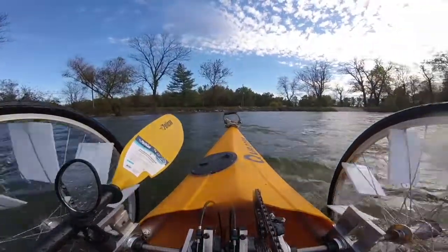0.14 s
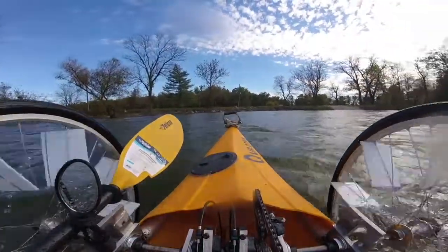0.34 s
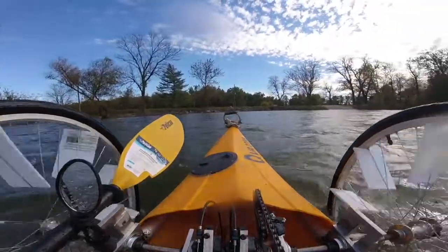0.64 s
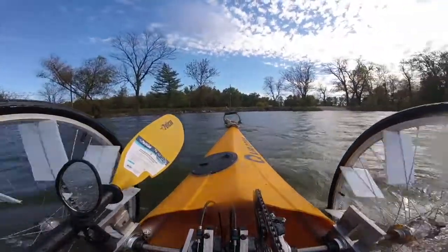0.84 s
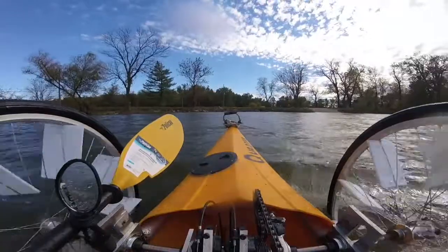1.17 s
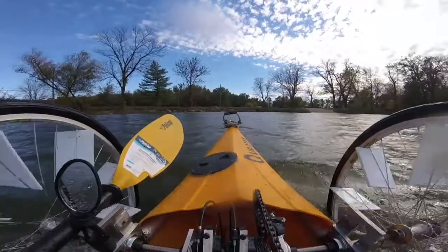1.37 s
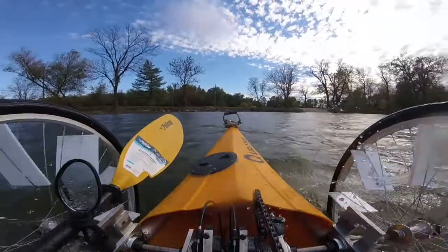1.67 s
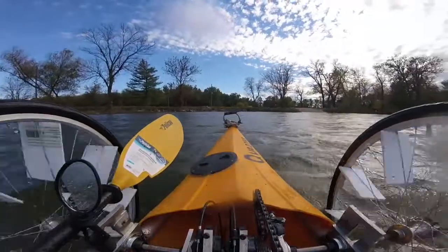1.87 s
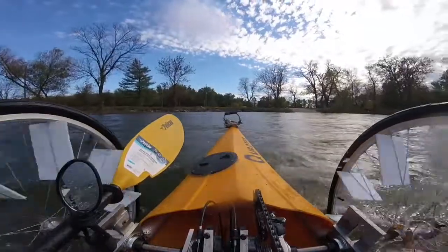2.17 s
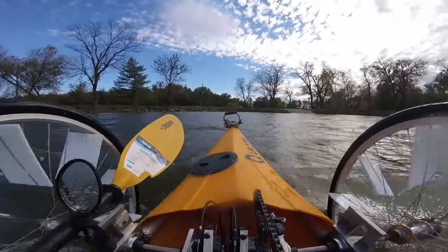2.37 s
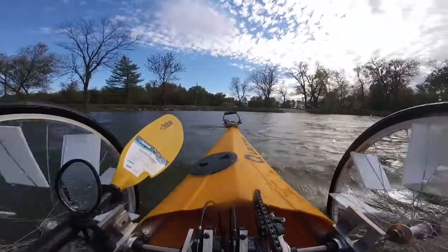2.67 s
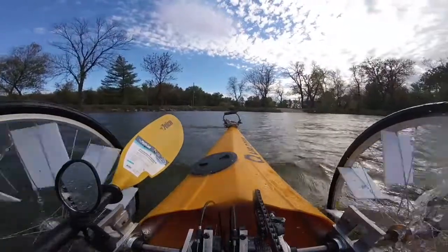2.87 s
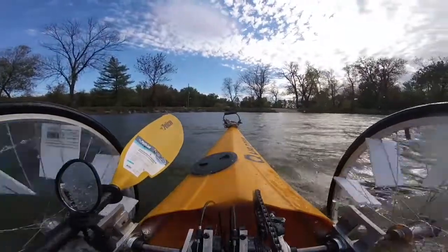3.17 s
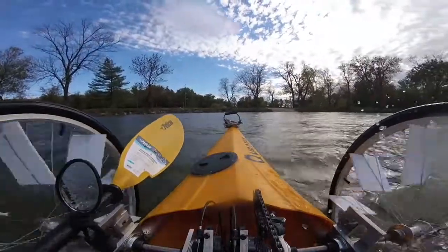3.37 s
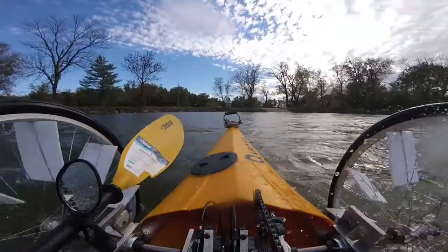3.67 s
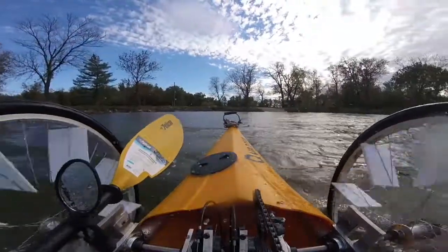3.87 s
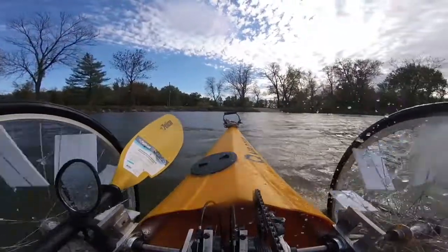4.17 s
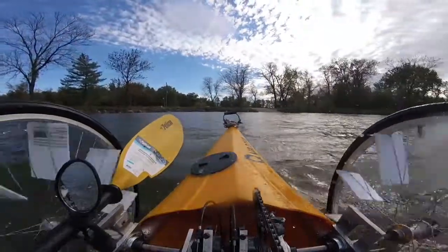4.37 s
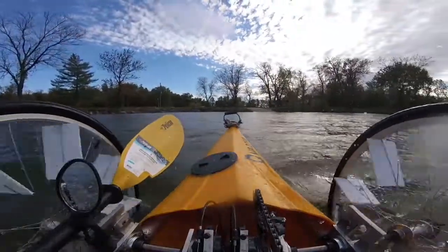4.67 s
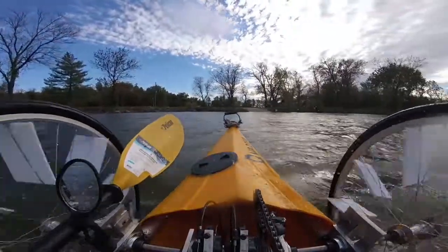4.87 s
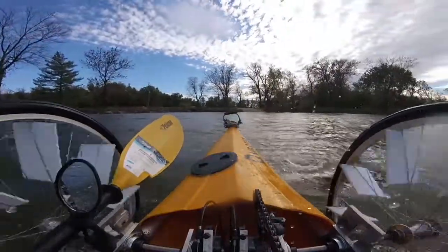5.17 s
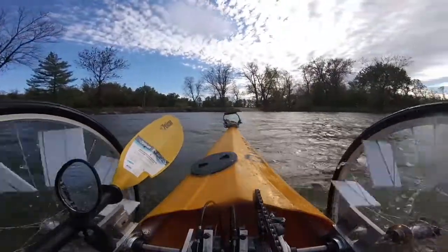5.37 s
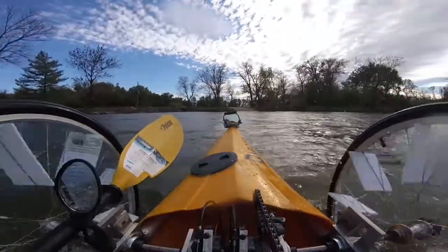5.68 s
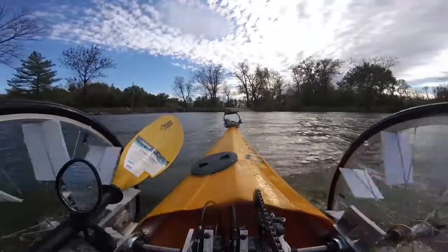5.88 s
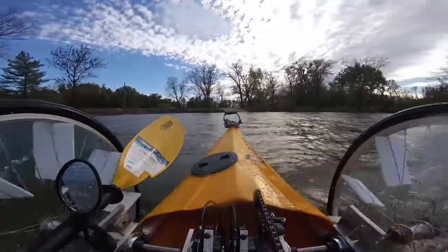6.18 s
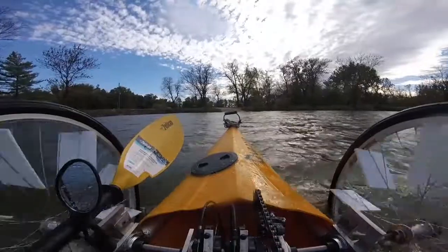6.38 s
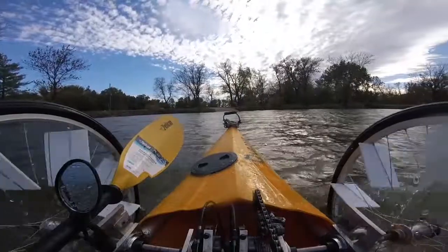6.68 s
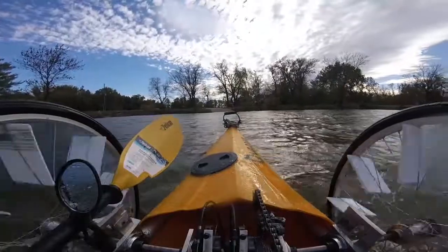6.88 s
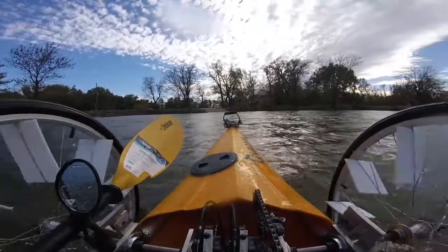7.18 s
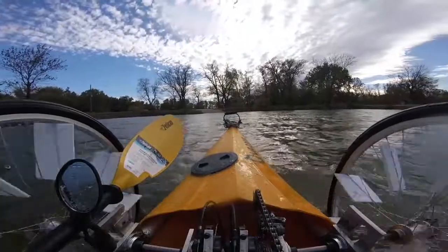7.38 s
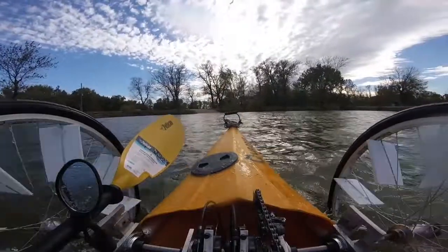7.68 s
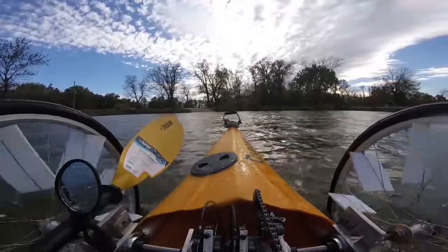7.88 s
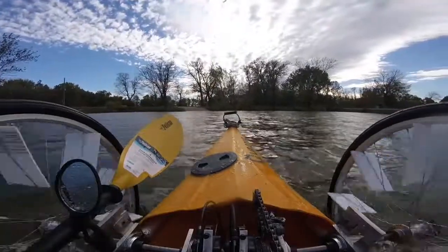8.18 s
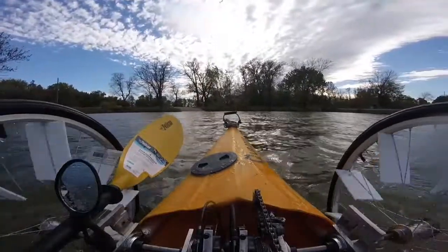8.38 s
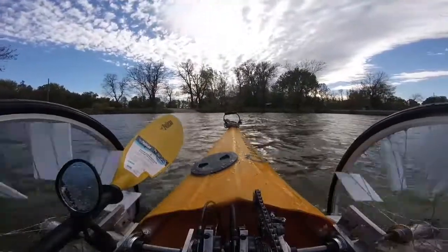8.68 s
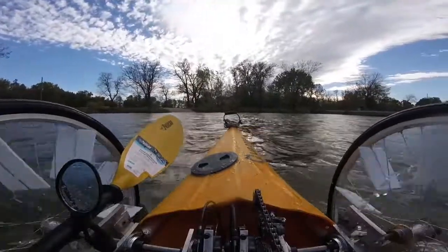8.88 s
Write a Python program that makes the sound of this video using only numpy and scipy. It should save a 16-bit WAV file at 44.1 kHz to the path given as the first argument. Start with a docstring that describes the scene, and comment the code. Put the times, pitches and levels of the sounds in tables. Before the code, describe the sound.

A close microphone on a kayak deck catches a constant rush of water thrown by flat blades. Bubbly gurgles, small slaps and crisp patter overlap, and low plopping gulps cluster around three to five seconds. Sharp drops hit the microphone's hard case with brief, high rings. Soft, very low wind buffets come and go. The sound is dry and outdoors, mostly centred, with faint wide foam behind; the closing seconds are strongest.

```python
"""Water rushes, gurgles and patters around a kayak that two paddle wheels drive across a lake.
The blades churn up bubbles, drag down air pockets that gulp, and throw splashes and spray.
Bubbles and gulps are fading sine tones; spray, foam and wake are mostly shaped bursts of noise.
Drops tick on a hard case on the deck, which rings and knocks; slow, deep noise makes the gusts
of wind thud softly against the microphone."""
import sys
import numpy as np
from scipy import signal
from scipy.fft import rfft, irfft, next_fast_len
from scipy.io import wavfile
from scipy.ndimage import uniform_filter1d, map_coordinates

SR = 44100
rng = np.random.default_rng(int(sys.argv[2]) if len(sys.argv) > 2 else 0)


def generate_wav(sig):
    """Save sig (samples, or channels by samples) to the path in sys.argv[1] as 16-bit PCM at SR."""
    pcm = np.round(np.clip(np.atleast_2d(sig).T, -1, 1) * 32767).astype(np.int16)
    wavfile.write(sys.argv[1], SR, pcm)


N = 398307  # length in samples

# Thrown water. Each row: time in seconds, level in dB before flutter and sheets.
FLOW_LEVEL = [(0.0, -40.5), (0.7, -38), (0.98, -45), (1.58, -44), (2.16, -40.5), (2.6, -48), (3.22, -40),
              (3.64, -42.5), (3.95, -53.5), (4.07, -51.5), (4.63, -43), (5.13, -44), (6.14, -38),
              (7.04, -41.5), (7.55, -36), (7.95, -39), (9.03, -37)]
# Sheets of water falling back on the lake. Each row: start in seconds, length in seconds, lift in dB.
FALLING_SHEETS = [(0.78, 0.16, 4), (1.125, 0.044, 2), (1.635, 0.15, 2), (1.872, .18, 4.5), (2.239, 0.15, 4),
                  (3.036, 0.043, 4.5), (3.712, 0.16, 5.5), (4.279, 0.029, 6.5), (4.394, 0.035, 4.5),
                  (5.395, 0.14, 2), (7.326, 0.041, 3.5), (7.585, 0.1, 2), (8.694, .13, 2.5),
                  (8.901, 0.088, 4)]
# Stirring under the surface. Each row: time in seconds, level in dB before the churn gains.
STIR_LEVEL = [(0, -71), (.15, -48.5), (.75, -46.5), (1.26, -89), (1.78, -42.5), (2.0, -70), (2.62, -96),
              (3.35, -45), (3.8, -55), (4.1, -64), (4.22, -43), (4.65, -52), (5.28, -89), (5.5, -59),
              (5.8, -86), (8.3, -97), (9.03, -53)]
# Wind between gusts. Each row: time in seconds, level in dB before the breeze gain and lumps.
BREEZE_LEVEL = [(0.0, -46.5), (1.03, -45), (1.26, -58), (1.42, -51), (2.2, -53.5), (2.65, -59.5),
                (3.3, -48), (3.95, -43.5), (4.1, -74), (4.25, -52.5), (4.93, -49), (5.27, -73), (5.55, -52),
                (5.88, -78), (6.34, -43), (6.56, -68), (7.17, -82), (7.67, -55), (8.15, -89), (9.03, -54)]
# Gusts that thud on the case. Each row: peak time in seconds, level in dB before the gust gain.
WIND_GUSTS = [(.19, -40), (.56, -47), (0.729, -37), (.93, -37), (.98, -31.5), (1.08, -42), (1.151, -35.5),
              (1.79, -43), (2.288, -36.5), (2.46, -32), (3.0, -41), (3.33, -46), (3.39, -39), (3.63, -33),
              (3.77, -32.5), (3.88, -41), (3.959, -39.5), (4.009, -32), (4.55, -53), (4.85, -37),
              (5.05, -31), (5.46, -40), (6.09, -35), (6.359, -30.5), (7.55, -40), (7.61, -43), (7.801, -41),
              (8.52, -48), (8.65, -39), (8.85, -43), (9.02, -35)]
# Air pockets dragged under by a blade. Each row: start in seconds, base pitch in Hz,
# peak level in dB before a 6 dB cut, time to fade by 60 dB in seconds.
AIR_POCKETS = [(0.148, 250, -35.5, 0.1), (0.215, 258, -28.5, 0.092), (0.335, 262, -28.5, 0.096),
               (0.623, 379, -24.5, 0.086), (1.138, 707, -33, 0.1), (1.479, 350, -41.5, 0.11),
               (1.665, 176, -42, 0.094), (1.701, 273, -26.5, 0.046), (1.878, 552, -32.5, 0.13),
               (2.338, 577, -35, 0.11), (2.453, 258, -39.5, 0.17), (3.021, 261, -25.5, 0.1),
               (3.053, 630, -22.5, 0.049), (3.271, 370, -29, 0.06), (3.295, 668, -31, 0.046),
               (3.3, 150, -37, 0.087), (3.34, 168, -29.5, 0.1), (3.372, 110, -32, 0.058),
               (3.39, 218, -28.5, 0.098), (3.458, 126, -29, 0.058), (3.58, 254, -23.5, 0.074),
               (3.618, 262, -29, 0.051), (3.733, 354, -25.5, 0.17), (3.784, 267, -26.5, 0.076),
               (3.909, 140.2, -25.5, 0.061), (3.91, 645, -35, 0.094), (4.015, 299, -33, 0.059),
               (4.148, 525, -32.5, 0.086), (4.218, 233, -32, 0.2), (4.286, 263, -29, 0.072),
               (4.3, 588, -33.5, 0.062), (4.435, 614, -36, 0.088), (4.54, 248, -35.5, 0.099),
               (4.795, 240, -38, 0.095), (5.044, 242, -25, 0.03), (5.065, 330, -34, 0.068),
               (5.162, 757, -27.5, 0.043), (5.161, 417, -31, 0.054), (5.162, 603, -28, 0.1),
               (5.465, 652, -35, 0.075), (5.535, 259, -38, 0.094), (6.087, 264, -34.5, 0.092),
               (6.154, 294, -23.5, 0.067), (6.335, 259, -41, 0.14), (6.451, 245, -39, 0.11),
               (6.82, 600, -33.5, 0.079), (7.032, 610, -32, 0.082), (7.263, 369, -17, 0.085),
               (7.286, 263, -36, .07), (7.786, 498, -29, 0.11), (8.7, 367, -19, 0.078),
               (8.727, 288, -35, .06)]
# Drops on the case and deck. Each row: start in seconds, crack level in dB, ring level in dB,
# knock level in dB (all before the final colour and 1 dB lift), knock pitch in Hz.
BIG_DROPS = [(0.2464, -37, -36.5, -34, 2000), (0.3527, -41.5, -57.0, -54, 3220.0),
             (0.3833, -39.5, -57, -58, 2380), (0.5238, -34.5, -39, -39.5, 4010.0),
             (0.6207, -37, -46, -39, 2410.0), (0.6576, -43, -41, -55.0, 1680),
             (0.795, -39, -57, -56.0, 2470), (1.086, -44.5, -52, -50, 1660.0),
             (1.238, -44, -51, -49, 2240.0), (1.323, -39.5, -51, -61.0, 2280.0),
             (1.5547, -38.5, -60.5, -62.0, 2820.0), (1.6995, -38, -44, -42.5, 3460),
             (1.84, -38.5, -42, -58.5, 3040.0), (2.1208, -46, -40.5, -44.5, 2720.0),
             (2.3334, -41, -42, -42, 2370), (2.7079, -52, -46.0, -52, 1930),
             (2.746, -54, -60.5, -43.5, 2200), (2.7724, -60, -51.0, -48, 2420),
             (2.8412, -55, -45, -50, 1790.0), (3.0571, -54, -39.0, -49, 1560.0),
             (3.1086, -35.5, -59.0, -45, 3900.0), (3.2472, -59, -59, -38.5, 3060.0),
             (3.5282, -45, -52, -48, 2560.0), (3.654, -41.5, -37, -53, 3000.0),
             (3.7796, -44.5, -40.5, -43, 2060.0), (4.08, -46.5, -63.5, -56, 1660),
             (4.1479, -43.5, -43.0, -66.5, 2940.0), (4.278, -59, -60, -49, 2000),
             (4.3041, -52, -48.0, -56, 1440), (4.333, -63, -58, -52, 2010), (4.4, -46.5, -60, -46, 2140),
             (4.7367, -39, -37, -57.0, 3060.0), (5.005, -39, -58, -58, 2560.0),
             (5.1641, -58.0, -60.5, -42.5, 1930), (5.3514, -41.5, -61, -42.5, 2500),
             (5.4008, -46, -47, -41, 1910), (5.573, -42.5, -55, -43, 2860),
             (5.6293, -44, -59.0, -40.5, 1990), (5.7, -39, -58.5, -60, 2480.0),
             (5.8343, -39, -54, -46, 2500), (5.934, -57, -41.5, -40, 2000),
             (5.976, -39.5, -54.0, -53, 1730), (6.2563, -38, -44, -40, 2430), (6.5348, -39, -40, -49, 4000),
             (6.539, -42, -49, -58.0, 2780.0), (6.8614, -40, -39.5, -39, 2950),
             (7.0118, -43.5, -41.5, -40, 2470), (7.322, -36, -37, -35.5, 3840.0),
             (7.4603, -36.5, -35.5, -33.5, 2310), (7.592, -33.5, -31.5, -46, 1590.0),
             (7.8664, -42, -38.5, -47.0, 3060), (8.0364, -38.5, -34.0, -56.0, 2640.0),
             (8.1871, -31.5, -35, -37, 2960.0), (8.2673, -42.0, -38.5, -52, 3480),
             (8.3242, -35.5, -36, -38.5, 2120), (8.5384, -40, -60, -47, 2640),
             (8.6379, -43, -55.0, -39.5, 2870), (8.7223, -53, -46, -35, 1920),
             (8.7732, -43, -51.0, -39, 2380)]
# The ring of the case: centre in Hz, width in Hz, boost in dB.
CASE_RING = (6500, 346, 8.35)

# Tone colours of the sounds. Each row: frequency in Hz, relative level in dB.
SPLASH_COLOUR = [(200, -56), (300, -44), (400, -27), (520, 0.5), (760, 0), (1400, -4.5), (2000, -2.5),
                 (2900, -11.5), (3800, -13.5), (5500, -22), (9000, -54)]
SPRAY_COLOUR = [(300, -84), (1200, -49), (2600, 0), (3800, -11.5), (5000, -1), (6000, -2.5), (7400, -6),
                (9000, -3), (10000, -5), (11000, -12.5), (12400, -54.5)]
DRIZZLE_COLOUR = [(300, -100), (1200, -24), (2500, 5), (3700, -18), (5000, 1), (6200, 3.5), (7400, -3),
                  (9000, -3), (10000, -5.5), (11000, -8), (12400, -35.5)]
TICK_COLOUR = [(200, -82), (450, -45), (800, -18), (1500, -14), (3000, -9.5), (4000, -8), (5300, 1),
               (7500, -7), (9800, -5), (11000, -17), (12500, -43)]
SNAP_COLOUR = [(250, -85), (700, -20), (1900, -0.5), (6000, 2.5), (10000, -3.5), (12500, -48)]
BUFFET_COLOUR = [(10, -18.5), (22, 2.5), (36, 4.5), (55, -7.5), (70, -24), (90, -17), (160, -69)]
WAKE_COLOUR = [(200, -34), (380, -21), (520, -8), (800, -9), (1400, -11.5), (2200, -15.5), (3400, -17),
               (5200, -17.5), (6600, -18), (7600, -14), (10000, -15.5), (11000, -32), (12200, -52)]
# Balance of the two sides. Each row: frequency in Hz, left over right in dB.
LEFT_LEAN = [(80, 0.5), (160, 2.1), (380, 0.5), (700, 2), (1400, 1.5), (2200, 0), (3600, 1), (6500, -0.24),
             (10000, 3.5), (12000, 1)]

TOP_HZ = 12600  # nothing is kept from here up
FLUTTER_DB, FLUTTER_PER_S = 0.93, 14  # the blades shed their water unevenly
SHEET_RISE_S, SHEET_FALL_S = 0.0019, 0.0018
SPLASH_DB, SPLASH_FOLLOW = -5.13, 0.94  # level over the mean flow; dB of splash per dB of flow
SPRAY_SHIFT_DB = -1.5  # from the flow to the level that drives the spray
HEAVY_SPRAY_DB, HEAVY_WIDTH_DB = -47.5, 4.5  # around this driving level drizzle turns to full spray
GURGLE_DB = -23.5  # over the flow
STIR_DB, STIR_SWING_DB, STIR_PER_S = 3.5, 7, 16  # gain; depth and rate of the lumps
BREAKUP_DB, BREAKUP_RISE_S, BREAKUP_FALL_S = -21.5, 0.0098, 0.0097  # pockets break into deep bubbles
GUST_STIR_DB = -18.5  # the water is rougher in a gust
GUST_HOLD_S, GUST_RISE_S, GUST_FALL_S = 0.018, 0.0092, 0.012  # one shape for all gusts
GUST_DB, BREEZE_DB = 2.5, 1.5  # gains
BREEZE_SWING_DB, BREEZE_PER_S = 7, 17  # depth and rate of the lumps
SWELL_SHARE = 0.088  # an air pocket's swelling time as a share of its fading time


def amp(db):
    """Decibels to gain."""
    return 10 ** (np.asarray(db) / 20)


def unit(x):
    """Scale x to an average strength (rms) of 1."""
    return x / np.sqrt(np.mean(x ** 2) + 1e-20)


def weighed(sound):
    """Scale a short sound so its energy equals 10 ms at rms 1."""
    return sound * np.sqrt(SR / 100 / np.sum(sound ** 2))


def along(points, hz):
    """Read a table of frequencies and values on a log frequency axis."""
    f, v = np.transpose(points)
    return np.interp(np.log(hz + 1), np.log(f + 1), v)


def curve(rows):
    """Join the timed levels of a table with straight lines, one value per sample."""
    s, level_db = np.transpose(rows)
    return np.interp(np.arange(N) / SR, s, level_db)


def wobble(rate):
    """Draw a smooth random curve through this many random points a second."""
    points = rng.standard_normal(int(N * rate / SR) + 4)
    return map_coordinates(points, [np.arange(N) * rate / SR])


def swell(start, hold, rise, fall):
    """An envelope that rises to 1 at start, holds and dies away."""
    t = np.arange(N) / SR - start
    before = np.maximum(-t / rise, 0)
    after = np.maximum((t - hold) / fall, 0)
    return np.exp(-np.minimum(before + after, 30))


def filtered(x, response):
    """Multiply the spectrum of x by a response given as a function of frequency."""
    size = next_fast_len(N + SR // 2)
    return irfft(rfft(x, size) * response(np.fft.rfftfreq(size, 1 / SR)), size)[..., :N]


def coloured(x, points, size=4096):
    """Give x a tone colour with a filter that never sounds ahead of its input."""
    cepstrum = irfft(np.log(amp(along(points, np.fft.rfftfreq(size, 1 / SR)))))
    # folding the log spectrum's transform forward in time gives the minimum-phase filter
    fold = np.r_[1, np.full(size // 2 - 1, 2), 1, np.zeros(size // 2 - 1)]
    impulse = irfft(np.exp(rfft(cepstrum * fold)))
    return signal.fftconvolve(x, impulse)[:N]


def patchy(x, depth_db, hz_order, time_order):
    """Shift the colour of x at random, in patches so many bins wide and frames long."""
    z = signal.stft(x, nperseg=512)[2]
    field = rng.standard_normal(z.shape)
    for _ in range(2):
        field = uniform_filter1d(field, hz_order, axis=0)
        field = uniform_filter1d(field, time_order, axis=1)
    return signal.istft(z * amp(depth_db * unit(field)), nperseg=512)[1][:N]


def add(track, s, sound):
    """Mix a sound into the track at time s in seconds."""
    part = track[max(round(s * SR), 0):][:len(sound)]
    part += sound[:len(part)]


def case_ring(x):
    """Add the short, high ring of the case: a resonance that boosts a narrow band."""
    centre, width, db = CASE_RING

    def response(hz):
        damping = 1j * hz * width
        return 1 + (amp(db) - 1) * damping / (centre ** 2 - hz ** 2 + damping)
    return filtered(x, response)


def bubbles(low_hz, high_hz, cycles, rise, spread_db, count, size):
    """A swarm of fading sines whose pitch climbs as each bubble nears the surface; rms 1."""
    when, pitch, life, strength = rng.random((count, 4)).T[..., None]
    hz = low_hz * (high_hz / low_hz) ** pitch
    turns = hz * np.arange(size) / SR
    age = turns / (cycles * (.5 + life))
    tone = np.sin(2 * np.pi * turns * (1 + rise * np.minimum(age, 2) / 2))
    ring = tone * (1 - np.exp(-2 * turns)) * np.exp(-np.log(30) * age)
    gain = amp(-spread_db * np.log(strength + 0.15)) * hz / low_hz
    at = (when * N).astype(int) + np.arange(size)
    return unit(np.bincount(at.ravel(), (gain * ring).ravel(), N)[:N])


def patter(per_s, spread_db, t60, cap=.01):
    """Droplets of scattered size, each a tiny noise burst; a higher cap tames the giants; rms 1."""
    chance, strength = rng.random((2, N))
    energy = (chance < per_s / SR) * amp(-spread_db * np.log(strength + cap)) ** 2
    fading = signal.lfilter([1], [1, -amp(-60 / (t60 * SR)) ** 2], energy)
    return unit(np.sqrt(np.abs(fading)) * rng.standard_normal(N))


def flow():
    """Level of the thrown water in dB: it flutters, and lifts briefly with every falling sheet."""
    lift_db = sum(db * swell(s, length, SHEET_RISE_S, SHEET_FALL_S) for s, length, db in FALLING_SHEETS)
    return curve(FLOW_LEVEL) + lift_db + FLUTTER_DB * wobble(FLUTTER_PER_S)


def gusting():
    """Strength of the gusts: each rises quickly, peaks around its time and lets go."""
    shapes = [amp(db) * swell(s - GUST_HOLD_S / 2, GUST_HOLD_S, GUST_RISE_S, GUST_FALL_S)
              for s, db in WIND_GUSTS]
    return np.max(shapes, axis=0)


def stirring(gusts):
    """Strength of the churning: lumps from the blades, rough water in gusts, pockets breaking up."""
    lumps_db = STIR_SWING_DB * np.minimum(wobble(STIR_PER_S), 1)
    lumps = amp(curve(STIR_LEVEL) + STIR_DB + lumps_db)
    breakup = sum(amp(db + BREAKUP_DB) * swell(s, t60 / 2, BREAKUP_RISE_S, BREAKUP_FALL_S)
                  for s, _, db, t60 in AIR_POCKETS)
    return np.sqrt(lumps ** 2 + breakup ** 2 + (amp(GUST_STIR_DB) * gusts) ** 2)


def splash(level_db):
    """Blades break the surface: gurgling and pinging bubbles and small slaps over a little foam."""
    gurgle = bubbles(450, 1200, cycles=28, rise=.12, spread_db=3.1, count=1300, size=2800)
    pings = bubbles(1100, 4200, cycles=20, rise=.1, spread_db=4.5, count=3000, size=1000)
    slaps = patter(per_s=200, spread_db=3.7, t60=.015, cap=.08)
    foam = rng.standard_normal(N) * amp(1.5 * wobble(30))
    surge = amp(2.2 * wobble(12))  # the gurgle swells and thins
    clusters = amp(2 * wobble(35))  # slaps grow louder and softer in bunches
    water = amp(-7) * surge * gurgle + amp(-3) * pings
    water = water + amp(2) * clusters * slaps + amp(-1.5) * foam
    clumps = patchy(water, depth_db=2.5, hz_order=4, time_order=6)
    return amp(level_db) * unit(coloured(clumps, SPLASH_COLOUR))


def spray(level_db, crowding=0.074, droplets_db=-8):
    """Flung water rains back as mist, fizzing tiny bubbles and sharp droplets, thin when little flies."""
    mist = patter(per_s=1500, spread_db=3.6, t60=.028, cap=.03) * amp(wobble(30))
    fizz = bubbles(3000, 10000, cycles=45, rise=0.08, spread_db=5, count=5000, size=600)
    rain = patchy(mist + amp(-10) * fizz, depth_db=1.5, hz_order=8, time_order=5)
    heavy = .5 + .5 * np.tanh((level_db - HEAVY_SPRAY_DB) / (2 * HEAVY_WIDTH_DB))
    shower = heavy * coloured(rain, SPRAY_COLOUR) + (1 - heavy) * coloured(rain, DRIZZLE_COLOUR)
    impacts = patter(per_s=110, spread_db=3.6, t60=.011, cap=.07)
    droplets = coloured(patchy(impacts, depth_db=2.5, hz_order=14, time_order=5), TICK_COLOUR)
    # droplets gain slightly on the shower in heavy spray
    droplet_gain = amp(droplets_db + crowding * (level_db - level_db.mean()))
    return amp(level_db - 2.5) * (unit(case_ring(shower)) + droplet_gain * unit(case_ring(droplets)))


def churn(strength):
    """Deep bubbles tumble in the wake of the submerged blades."""
    swarm = bubbles(146.8, 474.3, cycles=14.7, rise=0.046, spread_db=2.0, count=1200, size=3400)
    colour = [(90, -0.5), (160, -12.5), (260, 5.0), (360, 2.0), (480, 8.0), (900, -27.0)]
    return amp(-10) * strength * unit(coloured(swarm, colour))


def gurgles(flow_db):
    """Stray big bubbles surface at random moments, each a low fading note."""
    swarm = bubbles(270, 560, cycles=16, rise=.08, spread_db=3.5, count=110, size=8000)
    body = coloured(swarm, [(130, -55), (250, -4), (400, 0), (700, 0), (1400, -20)])
    return amp(flow_db + GURGLE_DB) * unit(body)


def spatter(flow_db):
    """Smaller drops land at random, each a dry snap of shifting colour that rings the case."""
    snaps = patter(per_s=24, spread_db=3, t60=.012, cap=.25)
    varied = patchy(snaps, depth_db=4, hz_order=14, time_order=5)
    return amp(flow_db - 13) * unit(case_ring(coloured(varied, SNAP_COLOUR)))


def wind(gusts):
    """Eddies push on the case in slow, deep swings."""
    lumps_db = BREEZE_SWING_DB * np.minimum(wobble(BREEZE_PER_S), 1)
    breeze = amp(curve(BREEZE_LEVEL) + BREEZE_DB + lumps_db)
    level_db = 20 * np.log10(breeze + amp(GUST_DB) * gusts)
    eddies = signal.hilbert(unit(coloured(rng.standard_normal(N), BUFFET_COLOUR)))
    # dividing by the envelope keeps each gust at a fairly even strength
    swing = unit(eddies.real / np.sqrt(np.abs(eddies) ** 2 + 0.91))
    slow = coloured(swing, [(28, -0.5), (45, -15.5), (70, -20.5), (120, -18)])
    force = 1 / (1 + amp(-32.5 - level_db))  # stronger wind sheds more of the faster eddies
    push = amp(level_db) * (force * swing + (1 - force) * slow)
    return coloured(push, [(60, 2.0), (80, -10.5), (110, -5.5), (200, -10)])


def wake(flow_db, follow=0.016):
    """Foam trailing on both sides of the hull: a faint, wide rush that hardly follows the flow."""
    foam = patchy(patter(per_s=3500, spread_db=4.5, t60=.03), depth_db=1, hz_order=6, time_order=9)
    level_db = -63 + follow * (flow_db - flow_db.mean())
    return amp(level_db) * unit(coloured(foam, WAKE_COLOUR))


def gulps(waver=0.041, slap_db=-11):
    """A blade slaps and an air pocket swells into a hollow note; harder plunges dive more in pitch."""
    dive, dive_s, sag_per_s, hard_db = .33, .007, 3.6, -21  # full dive from hard_db up
    slap_ratio, slap_t60 = 2.2, .022  # slap pitch over base pitch; fading time in seconds
    track, t = np.zeros(N), np.arange(SR // 5) / SR
    shake = wobble(130)  # the wall of the pocket quivers
    for s, hz, db, t60 in AIR_POCKETS:
        swell_s, force = SWELL_SHARE * t60, min(1, amp(db - hard_db))
        at = (round(s * SR) + np.arange(len(t))) % N
        shape = (1 - np.exp(-(t / swell_s) ** 2)) * amp(-60 * t / t60)
        bend = force * (dive * np.exp(-t / dive_s) - sag_per_s * (t - swell_s))
        pitch = hz * np.exp(bend + waver * shake[at])
        note = shape / shape.max() * np.sin(2 * np.pi * np.cumsum(pitch) / SR)
        slap_shape = amp(slap_db - 60 * t / slap_t60) * (1 - np.exp(-hz * t))
        slap = slap_shape * np.sin(2 * np.pi * slap_ratio * hz * t)
        add(track, s, amp(db - 6) * (note + slap))
    return track


def drops():
    """A big drop spikes, cracks flat and scatters; the case rings and the spot it hits knocks dully."""
    hit_s, scatter_db, scatter_t60, ring_t60, knock_t60 = .0033, -17, .04, .018, .016
    tear_db, tearing = 3, wobble(900)  # the drop tears into smaller ones
    cracks, tones, t = np.zeros(N), np.zeros(N), np.arange(SR // 20) / SR
    onset = 1 - np.exp(-t / .0002)
    spike = .6 * np.exp(-((t - .0007) / .0005) ** 2)
    scatter = amp(scatter_db - 60 * t / scatter_t60)
    burst = spike + onset * (np.exp(-(t / hit_s) ** 2) + scatter)
    ring_shape = (1 - np.exp(-2 * t / hit_s)) * amp(-60 * t / ring_t60)
    knock_shape = onset * amp(-60 * t / knock_t60)
    ratios, weights = np.array([.7, .88, 1.03, 1.3]), np.array([.3, .55, 1, .3])  # knock partials
    for s, crack_db, ring_db, knock_db, hz in BIG_DROPS:
        ragged = amp(tear_db * tearing[(round(s * SR) + np.arange(len(t))) % N])
        noise = np.sign(rng.standard_normal(len(t)))
        add(cracks, s, amp(crack_db) * weighed(burst * ragged * noise))
        detune, phase = rng.random((2, len(ratios)))
        ring_hz = CASE_RING[0] + CASE_RING[1] * (detune[0] - .5)
        add(tones, s, amp(ring_db) * weighed(ring_shape * np.sin(2 * np.pi * ring_hz * t)))
        modes = hz * ratios * (1 + (detune - .5) / 10)
        note = weights @ np.sin(2 * np.pi * (modes[:, None] * t + phase[:, None]))
        add(tones, s, amp(knock_db) * weighed(knock_shape * note))
    tick = coloured(np.arange(N) == 0, TICK_COLOUR)  # a single click, to level the colour filter
    cracks = coloured(cracks, TICK_COLOUR) / np.linalg.norm(tick)
    return amp(1) * (cracks + coloured(tones, [(150, -45), (500, -14), (1100, 0)]))


def scene():
    """Near water and wind reach both sides alike; the wake and some churning differ and give width."""
    flow_db, gusts = flow(), gusting()
    stir = stirring(gusts)
    mean_db = flow_db.mean()
    splash_db = mean_db + SPLASH_DB + SPLASH_FOLLOW * (flow_db - mean_db)
    mid = splash(splash_db) + spray(flow_db + SPRAY_SHIFT_DB) + churn(stir) + gurgles(flow_db)
    mid = mid + spatter(flow_db) + wind(gusts) + gulps() + drops()
    side = wake(flow_db) + amp(-16.5) * churn(stir)
    return np.array([mid + side, mid - side])


def record(dry):
    """Tilt the balance of left and right by frequency and cut everything from the top limit up."""
    def response(hz):
        lean_db = np.outer([.5, -.5], along(LEFT_LEAN, hz))
        return amp(lean_db) * (hz < TOP_HZ)
    return filtered(dry, response)


dry = scene()
out = record(dry)
generate_wav(out)
```